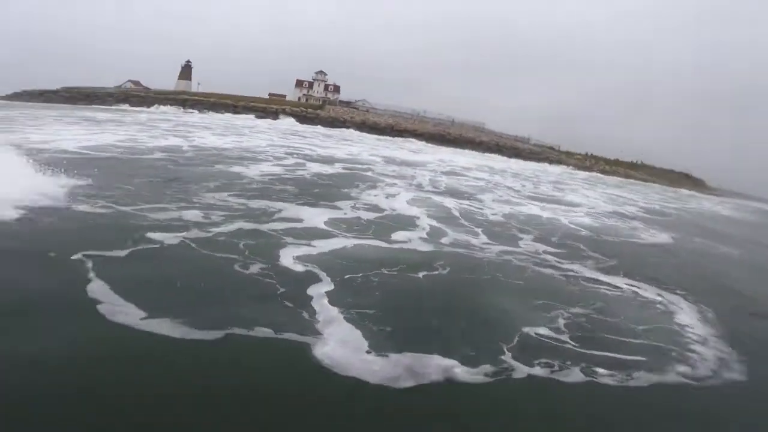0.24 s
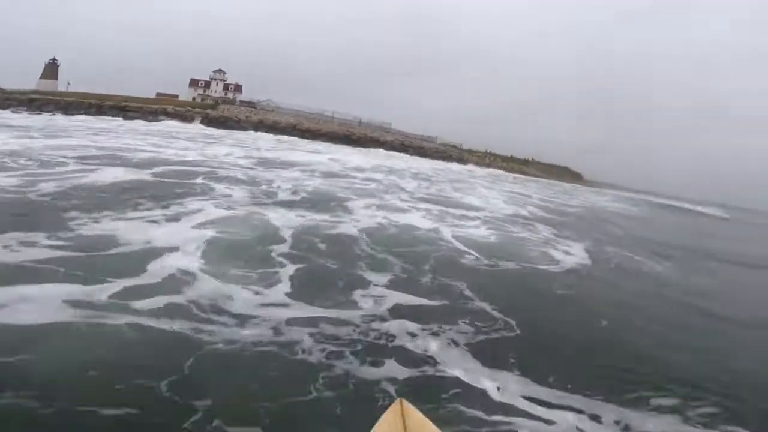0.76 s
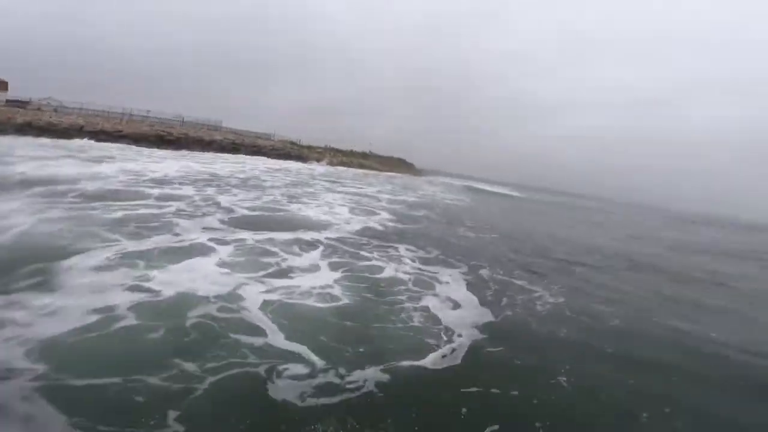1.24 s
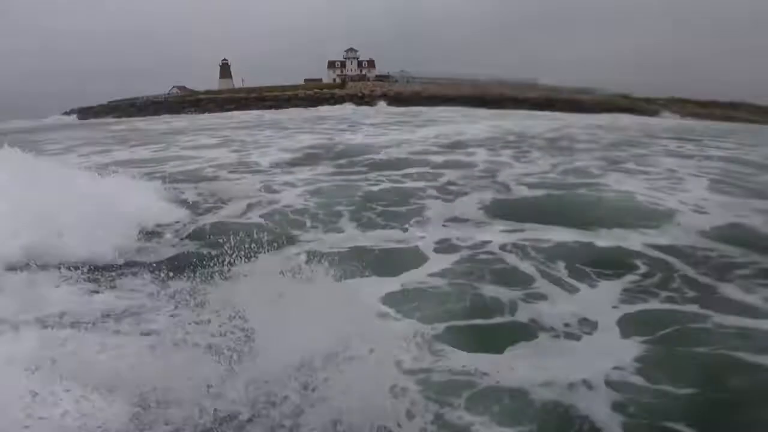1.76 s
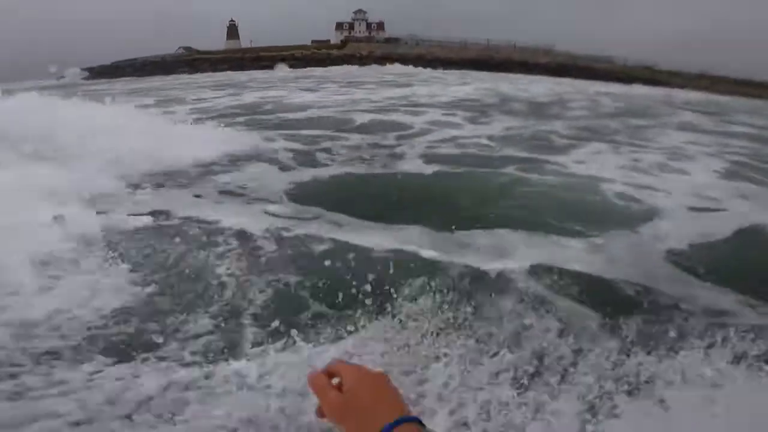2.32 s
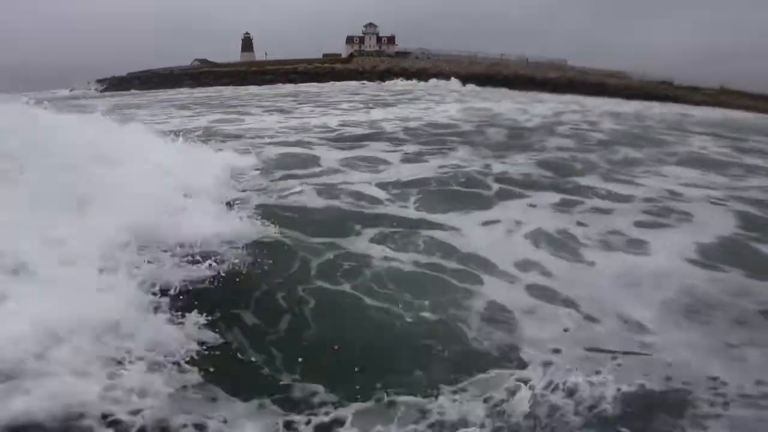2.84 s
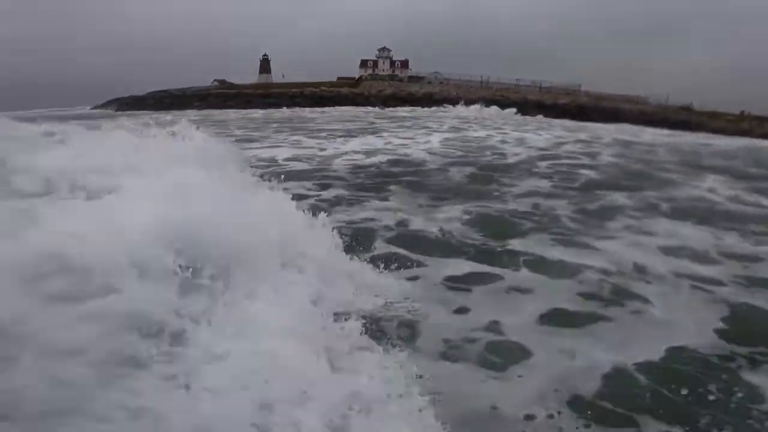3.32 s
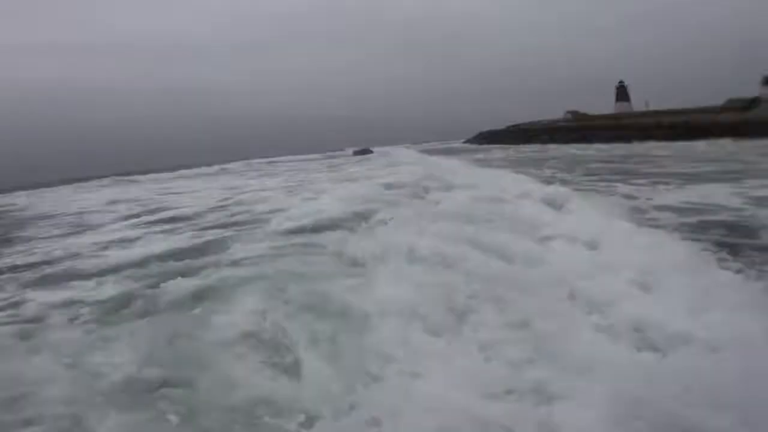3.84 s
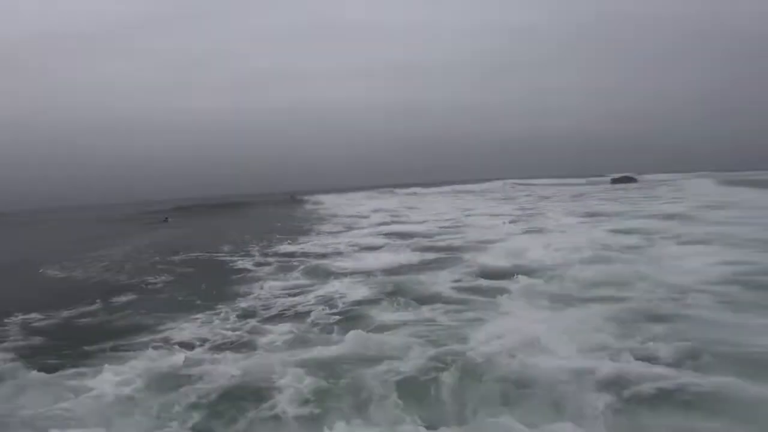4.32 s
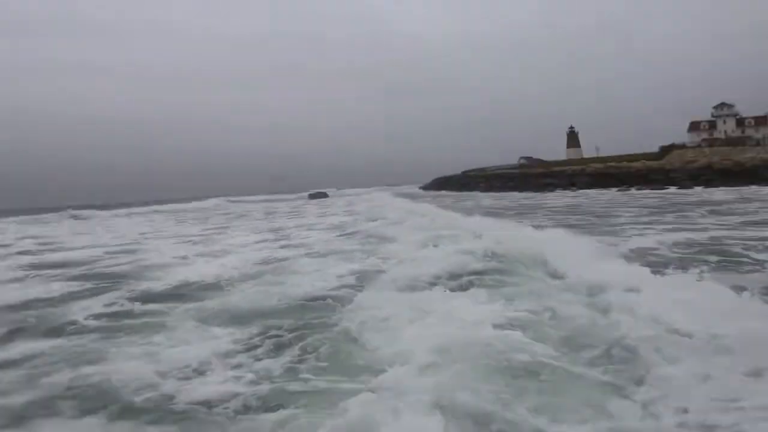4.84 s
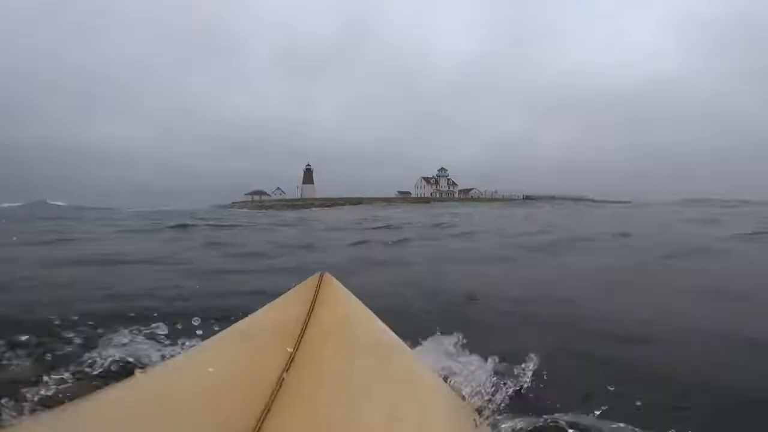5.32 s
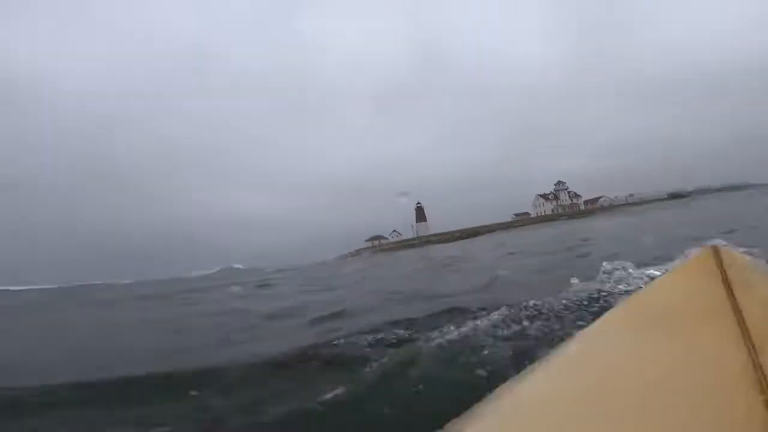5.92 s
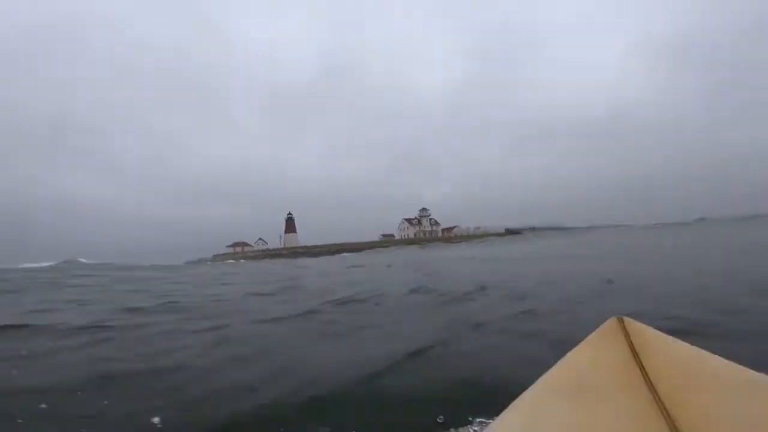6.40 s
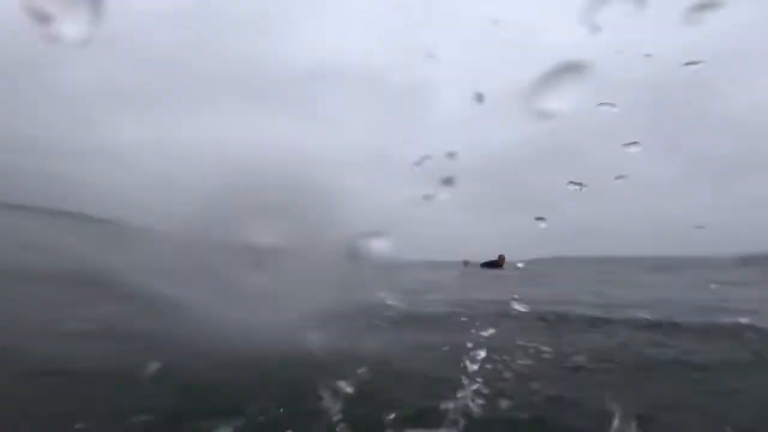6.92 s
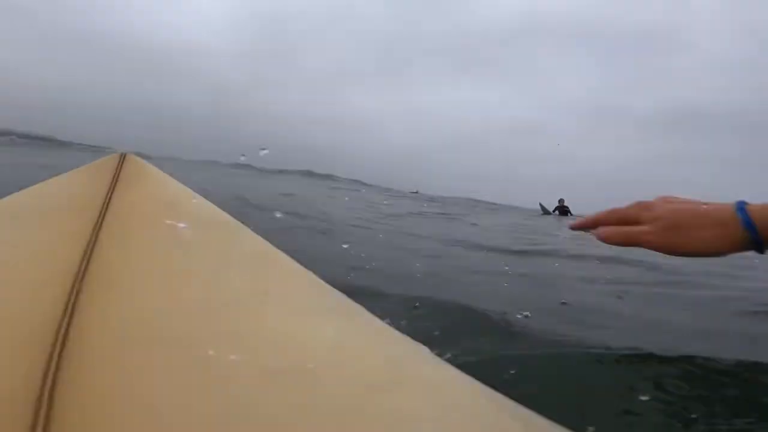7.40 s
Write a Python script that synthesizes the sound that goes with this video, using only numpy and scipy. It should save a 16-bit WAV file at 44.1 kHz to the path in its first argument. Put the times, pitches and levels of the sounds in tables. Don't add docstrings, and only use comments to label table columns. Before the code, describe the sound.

A microphone in a wet waterproof housing rides a breaking wave: dull, dense whitewater roar, low wind buffeting, soft foam thuds and faint muffled fizz. After five seconds it cuts hard, with a tiny gap, to paddling on calmer open water: close hollow gulps, bubbling gurgles, ticking drops, then a brief splash washing over the housing.

```python
import sys
import numpy as np
from scipy import signal
from scipy.fft import rfft, irfft, next_fast_len
from scipy.io import wavfile
from scipy.ndimage import uniform_filter1d, minimum_filter1d, map_coordinates

SR = 44100
rng = np.random.default_rng(int(sys.argv[2]) if len(sys.argv) > 2 else 0)


def output_pcm(signal):
    pcm = np.clip(np.atleast_2d(signal).T, -1, 1) * 32767
    wavfile.write(sys.argv[1], SR, np.round(pcm).astype(np.int16))


def nominal_scale(level):
    x = np.asarray(level, float) / 20
    return 10 ** x


N = 337638

# frequency_hz, density_db (per Hz)
WIND_SPECTRUM = [(12, -37), (22, -2.5), (40, -1.5), (90, -4.5), (140, -9), (250, -18.5), (500, -46),
                 (1000, -120)]
RIDE_ROAR_SPECTRUM = [(60, -41), (120, -3.5), (220, -1), (350, -4.5), (550, -5.5), (800, -10.5),
                      (1200, -25.5), (2000, -50), (4000, -120)]
PADDLE_ROAR_SPECTRUM = [(60, -48.5), (120, -10.5), (220, -2.5), (350, -0.5), (550, -4), (800, -6),
                        (1300, -17.5), (1800, -44.5), (4000, -120)]
WASH_SPECTRUM = [(500, -37.5), (900, 6.5), (1200, -0.5), (1500, -9.5), (2000, -18), (2500, -24),
                 (3200, -46.5), (6000, -120)]
FIZZ_SPECTRUM = [(1500, -32), (2500, 1), (3200, -3), (4200, -8.5), (5200, -14.5), (6500, -21.5),
                 (8000, -31.5), (9300, -42), (9900, -74.5), (16000, -90.5)]
# frequency_hz, gain_db
SPATTER_SPECTRUM = [(800, -40), (1600, 3), (3000, -2), (4500, -10), (6000, -21), (7500, -34), (10000, -70)]
# centre_hz, width_hz, level_db
HOUSING_MODES = [(1920, 300, -2), (2700, 450, -23), (1350, 400, -1), (3750, 600, -22), (4900, 600, -30),
                 (6300, 900, -43), (880, 150, 8)]

# time_s, strength_db
WIND_STRENGTH = [(0.03, -17.5), (0.3, -25), (0.81, -21), (1.78, -24), (2.14, -22), (2.86, -25.5),
                 (3.35, -19.5), (4.04, -25), (4.63, -20), (5.06, -27), (5.3, -18), (5.79, -21.5),
                 (6.08, -17), (6.29, -23.5), (7.46, -21.5), (7.64, -27.5)]
# time_s, strength_db
RIDE_CHURN = [(0.03, -20.5), (0.28, -20.5), (0.65, -19), (1.26, -18), (1.75, -19), (2.23, -18.5),
              (2.78, -18.5), (2.9, -16.5), (3.57, -17.5), (4.84, -18.5), (5.26, -17)]
# time_s, strength_db
PADDLE_CHURN = [
    (5.35, -23.5),
    (5.47, -22.5),
    (5.5, -26),
    (5.7, -25),
    (5.86, -21),
    (6.3, -22.5),
    (6.79, -22.5),
    (7.1, -21.5),
    (7.64, -21.5),
]
# time_s, density_db
SPRAY_DENSITY = [(0.03, -63.5), (0.4, -57), (1.2, -60.5), (1.7, -59), (2.3, -59.5), (3.1, -61), (3.6, -60),
                 (4.15, -63.5), (5.06, -67), (5.26, -64), (5.35, -64.5), (7.64, -64.5)]

# start_s, length_s, strength_db, fizz_share (ratio)
SLOSHES = [(0.137, 0.31, -1, 0.22), (0.79, 0.3, -4.5, 0.46), (1.09, 0.37, -6, 0.093), (1.31, 0.31, -2, 1.9),
           (1.452, 0.21, -3.5, 1.4), (1.613, 0.29, 1.5, 0.75), (2.365, 0.15, 3.5, 0.12),
           (2.522, 0.21, 2, 0.033), (1.79, .14, 1, 2.5), (1.902, 0.6, -1.5, .05), (2.7, 0.12, -10, 0.6),
           (2.8, 0.26, -3.5, .05), (3.0, 0.045, -7.5, 0.44), (3.096, 0.063, 4, 0.076),
           (3.208, 0.2, -3, 1.3), (3.844, 0.13, -6, 0.1), (4.048, 0.15, -5, 0.75), (5.383, 0.11, 0.5, 1.2),
           (5.474, 0.053, -4.5, 1.2), (5.537, 0.087, 4, 0.81), (5.632, 0.03, 4, .2), (5.79, 0.15, 4, 1.1),
           (5.946, 0.089, 0, 1.2), (6.15, 0.12, 3.5, 1.1), (6.244, 0.11, 6, 0.44), (6.38, 0.32, 5.5, 1.1),
           (6.6, 0.12, 2.5, .8), (6.688, 0.28, -6.5, 0.76), (6.839, 0.04, 8, 1.2), (6.903, .035, 4, 1.4),
           (6.96, .05, 3.5, 0.13), (7.03, 0.12, 3.5, .6), (7.247, .36, 4.5, 1.1)]
# start_s, length_s, level_db, top_hz
MIST_WISPS = [
    (1.27, .07, -82, 15500),
    (1.385, .03, -90, 14000),
    (3.17, 0.042, -97, 13000),
    (5.338, .1, -83, 15000),
    (7.058, .07, -88, 12500),
]
# start_s,
# length_s, level_db, pitch_hz
AIR_POCKETS = [(0.45, 0.3, -22.5, 173), (0.796, 0.36, -23.5, 184), (1.05, 0.35, -18, 181),
               (2.383, .11, -30.5, 1340), (2.395, 0.09, -40, 1900), (3.09, .08, -35, 1250),
               (2.538, 0.065, -42, 1700), (2.52, 0.14, -22.5, 270), (2.652, 0.058, -20, 326),
               (2.817, 0.15, -20, 259), (3.099, 0.18, -22, 252), (4.38, 0.2, -24, 170),
               (4.908, 0.26, -18, 268), (5.201, 0.18, -16.5, 303), (5.501, .25, -32.5, 340),
               (5.53, 0.22, -35.5, 540), (5.797, 0.088, -24.5, 262), (5.54, .08, -36, 1300),
               (5.83, 0.11, -38, 1300), (5.36, .13, -26.5, 630), (2.55, .16, -37, 1250),
               (1.62, .2, -35.5, 1230), (7.27, .2, -46.5, 2000), (2.44, .12, -38, 1500),
               (2.62, .09, -46, 2100), (5.6, .1, -30, 950), (2.1, .12, -48, 2100),
               (5.902, 0.55, -39.5, 970), (6.452, 0.22, -34, 1100), (6.15, .19, -65, 3300),
               (6.47, 0.24, -50, 2260), (6.5, 0.22, -59.5, 3200), (6.6, 0.076, -25.5, 286),
               (6.932, 0.069, -29, 1070), (7.06, 0.079, -21, 300)]
# start_s, peak_db, brightest_hz
DROPS = [(2.447, -54, 3600), (5.361, -51, 3200), (5.394, -52, 2800), (5.403, -49, 4300),
         (5.4045, -44, 2600), (5.442, -50, 3200), (5.457, -54, 3800), (5.531, -51, 3000),
         (5.571, -52, 4500), (5.587, -50, 4700), (5.600, -43, 3200), (5.651, -52, 3400), (5.676, -48, 3700),
         (5.781, -59, 4600), (5.808, -55, 5200), (5.809, -44, 2300), (5.84, -45, 3400),
         (5.845, -57.5, 5700), (5.864, -43, 2900), (5.891, -53.5, 3900), (5.958, -45, 2600),
         (5.986, -53, 3000), (6.010, -46, 2754), (6.05, -48, 2750), (6.096, -53, 2800), (6.190, -49, 3600),
         (6.435, -53, 4500), (6.463, -53, 5200), (6.487, -51, 4200), (6.776, -52, 2600), (6.837, -58, 5300),
         (6.845, -50.5, 4500), (6.846, -49, 2500), (6.859, -47, 3900), (6.860, -45, 2000),
         (6.876, -55, 3500), (6.914, -49, 4000), (6.975, -54, 4000), (7.027, -50, 3800), (7.037, -40, 4000),
         (7.038, -34, 2400), (7.047, -47, 2800), (7.075, -42, 3800), (7.103, -56, 5900), (7.163, -45, 4200),
         (7.183, -44, 4100), (7.200, -55, 4000), (7.220, -56, 4900), (7.252, -55, 3000), (5.638, -31, 1700),
         (5.601, -40, 1800), (6.859, -38, 1500), (7.222, -41, 1800), (7.398, -35, 1900), (7.4, -52, 3200),
         (7.435, -44, 2300), (7.53, -40, 1750), (7.532, -53, 3000), (6.097, -54, 5000), (6.34, -57, 5200)]
# start_s, peak_db, pitch_hz
LARGE_BUBBLES = [(3.125, -33, 2250), (5.478, -13, 700), (5.552, -16.5, 847), (5.556, -17, 890),
                 (5.638, -24, 1450), (5.672, -13, 793), (5.726, -16, 667), (6.004, -12.5, 900),
                 (6.057, -10.5, 794), (6.297, -15, 840), (6.31, -14.5, 885), (6.345, -9, 800),
                 (6.441, -17, 780), (6.488, -14.5, 705), (6.545, -16, 744), (6.588, -14.5, 977),
                 (6.648, -13, 825), (6.688, -12.5, 620), (6.876, -23, 1450), (6.938, -14, 780),
                 (6.98, -30, 1500), (6.995, -13.5, 500), (7.035, -28, 1740), (7.074, -23, 1320),
                 (7.105, -33, 2040), (7.14, -28, 1980), (7.19, -38, 2200), (7.218, -27, 1300),
                 (5.343, -21, 940), (5.362, -15, 432), (5.385, -16, 700), (5.466, -13.5, 450),
                 (5.64, -16, 906), (5.772, -30, 1245), (5.862, -25, 1360), (5.905, -14.5, 600),
                 (6.518, -17, 603), (6.712, -15.5, 480), (6.742, -19.5, 450), (6.858, -15.5, 854),
                 (6.982, -15, 678), (7.292, -13.5, 800), (7.445, -12.5, 850), (7.487, -17, 550),
                 (7.545, -14, 620), (7.625, -20, 780)]
# start_s, peak_db, pitch_hz
FOAM_BURSTS = [(0.094, -14, 716), (0.47, -13, 452), (0.678, -12.5, 568), (0.95, -16, 538),
               (1.579, -14, 565), (2.148, -12, 735), (2.625, -14, 563), (2.799, -10, 584),
               (2.873, -11, 541), (2.943, -15, 681), (3.026, -16, 587), (3.208, -9, 681), (3.464, -10, 659),
               (3.698, -13, 452), (3.83, -13, 479), (3.918, -16, 560), (4.137, -16, 587), (4.43, -16, 522),
               (4.65, -14, 592), (4.828, -10, 662), (5.043, -15.5, 581), (5.102, -14, 592)]

CUT_S, RETURN_S, FADE_S = 5.29435, 5.331, 0.012
OPENING, CREST = .27, 0.31
WASH_OVER_DB, WASH_FOLLOWS = 24, 0.3
SLOSH_RISE, SLOSH_FALL = 0.32, .3
SLOSH_ROAR = 0.15
PORT_SHUT_S, PORT_DRAIN = .015, 0.53
POCKET_WIDTH, POCKET_EDGE = 0.19, 0.39
DROP_WIDTH, DROP_SPREAD = .19, .36
SHEET_S, SHEET_LENGTH_S, SHEET_EDGE_S = 7.028, .18, .016
SHEET_DB, SHEET_SAG_DB_PER_S = -29.5, 28


def unit(x):
    return x / np.sqrt(np.mean(x ** 2) + 1e-20)


def along(points, hz):
    f, v = np.transpose(points)
    return np.interp(np.log(hz + 1), np.log(f + 1), v)


def curve(rows):
    s, value = np.transpose(rows)
    return np.interp(np.arange(N) / SR, s, value)


def wobble(rate_hz):
    knots = rng.standard_normal(int(N * 80 / SR) + 4)
    return map_coordinates(knots, [np.arange(N) * rate_hz / SR])


def swell(start_s, length_s, rise_s, fall_s):
    corners_s = start_s + np.sort([0, rise_s, length_s - fall_s, length_s])
    return np.interp(np.arange(N), corners_s * SR, [0, 1, 1, 0])


def filtered(x, response):
    m = next_fast_len(N + 8192)
    return irfft(rfft(x, m) * response(np.fft.rfftfreq(m, 1 / SR)), m)[:N]


def patchy(depth_db):
    z = signal.stft(rng.standard_normal(N), nperseg=512)[2]
    field = uniform_filter1d(rng.standard_normal(z.shape), size=5, axis=0)
    field = uniform_filter1d(field, size=8, axis=1)
    return signal.istft(z * nominal_scale(depth_db * unit(field)), nperseg=512)[1][:N]


def bubbles(starts_s, hz, size, cycles, rise):
    t = np.arange(1200) / SR
    turns = hz[:, None] * t
    ring = np.sin(2 * np.pi * turns * (1 + rise * turns / cycles / 2))
    ring *= size[:, None] * np.exp(-3 * turns / cycles) * (1 - np.exp(-turns / 1.2))
    ring *= np.cos(np.pi / 2 * t / t[-1])
    at = np.round(starts_s * SR).astype(int)[:, None] + np.arange(len(t))
    return np.bincount(at.ravel(), ring.ravel(), N + len(t))[:N]


def froth(spectrum, centre_hz, cycles, share, spread_db, depth_db, count):
    draw = rng.random((count, 3))
    hz = centre_hz * np.exp(1.366 * (draw[:, 1] - .5))
    size = nominal_scale(-spread_db * np.log(0.026 + draw[:, 2]))
    swarm = unit(bubbles(draw[:, 0] * N / SR, hz, size, cycles, rise=0.26))
    noise = unit(filtered(patchy(depth_db), lambda f: nominal_scale(along(spectrum, f))))
    centre_db = along(spectrum, centre_hz)
    swarm = unit(filtered(swarm, lambda f: nominal_scale(np.minimum(along(spectrum, f) - centre_db, 0))))
    return unit(np.sqrt(1 - share) * noise + np.sqrt(share) * swarm)


def wind():
    buffet = filtered(patchy(0.54), lambda f: nominal_scale(along(WIND_SPECTRUM, f)))
    return nominal_scale(curve(WIND_STRENGTH)) * unit(nominal_scale(0.5 * wobble(6.1)) * buffet)


def mist():
    air = rng.standard_normal(N)
    out = np.zeros(N)
    for s, length, db, top_hz in MIST_WISPS:
        hiss = unit(filtered(air, lambda f: (f > 7500) & (f < top_hz)))
        out += nominal_scale(db) * swell(s, length, .3 * length, .3 * length) * hiss
    return out


def slosh_levels():
    shapes = []
    for s, length, db, _ in SLOSHES:
        if db > 0:
            shapes.append(swell(s, length, SLOSH_RISE * length, SLOSH_FALL * length))
        else:
            shapes.append(swell(s, length, PORT_SHUT_S, PORT_DRAIN * length))
    shapes = np.array(shapes)
    _, _, slosh_db, fizz_share = np.transpose(SLOSHES)
    return slosh_db @ shapes, (fizz_share * slosh_db) @ shapes


def roar(slosh_db, surge, calm):
    foam = froth(RIDE_ROAR_SPECTRUM, 430.7, cycles=7.5, share=.12, spread_db=4, depth_db=0.5, count=2500)
    gurgle = froth(PADDLE_ROAR_SPECTRUM, 748, cycles=12.5, share=0.12, spread_db=2.5, depth_db=0.6,
                   count=1100)
    level_db = curve(RIDE_CHURN + PADDLE_CHURN) + SLOSH_ROAR * slosh_db
    return nominal_scale(level_db + 0.26 * surge + 0.46) * np.where(calm, gurgle, foam)


def wash(slosh_db, surge):
    spray_db = curve(SPRAY_DENSITY)
    mean_db = spray_db.mean()
    level_db = mean_db + WASH_OVER_DB + WASH_FOLLOWS * (spray_db - mean_db) + slosh_db
    water = froth(WASH_SPECTRUM, 1500, cycles=7, share=.12, spread_db=3, depth_db=1.2, count=3500)
    return nominal_scale(level_db + surge + 4.5) * water


def fizz(slosh_db, surge, calm):
    foam = froth(FIZZ_SPECTRUM, 4000, cycles=3.5, share=.1, spread_db=3, depth_db=1.2, count=4000)
    droplets = froth(FIZZ_SPECTRUM, 3200, cycles=16, share=.07, spread_db=3, depth_db=2.2, count=600)
    level_db = curve(SPRAY_DENSITY) + slosh_db
    flicker_db = 0.44 * surge + 0.97 * wobble(35) * calm
    return nominal_scale(level_db + flicker_db + 1.74) * np.where(calm, droplets, foam)


def sea():
    slosh_db, fizz_slosh_db = slosh_levels()
    calm = np.arange(N) / SR > CUT_S
    surge = wobble(22) * np.where(calm, 1.6, .8)
    return roar(slosh_db, surge, calm) + wash(slosh_db, surge) + fizz(fizz_slosh_db, surge, calm)


def air_pockets():
    out = np.zeros(N + SR)
    f = np.fft.rfftfreq(SR // 2, 1 / SR)
    for s, length, db, hz in AIR_POCKETS:
        resonance = np.exp(-((f / hz - 1) / POCKET_WIDTH) ** 2)
        band = unit(irfft(rfft(rng.standard_normal(SR // 2)) * resonance))
        u = np.arange(len(band)) / SR / length
        envelope = np.clip(np.minimum(u, 1 - u) / POCKET_EDGE, 0, 1)
        out[round(s * SR):][:len(band)] += nominal_scale(db) * band * envelope
    return out[:N]


def sheet():
    level_db = SHEET_DB - SHEET_SAG_DB_PER_S * (np.arange(N) / SR - SHEET_S).clip(0)

    def modes(f):
        return sum(nominal_scale(db) * np.exp(-((f - c) / w) ** 2) for c, w, db in HOUSING_MODES)

    hiss = nominal_scale(level_db + 2 * wobble(40)) * unit(filtered(patchy(2), modes))
    return hiss * swell(SHEET_S, SHEET_LENGTH_S, SHEET_EDGE_S, 2 * SHEET_EDGE_S) ** 2


def drops():
    t = np.arange(2048) / SR
    f = np.fft.rfftfreq(len(t), 1 / SR)
    lead = 256
    puff = np.roll(np.exp(-t / .0016) + .25 * np.exp(-t / .006), lead)
    out = np.zeros(N + len(t))
    for s, db, hz in DROPS:
        plain = nominal_scale(along(SPATTER_SPECTRUM, f)) * DROP_SPREAD / (1 + (f / hz / 1.6) ** 4)
        colour = plain + np.exp(-((f / hz - 1) / DROP_WIDTH) ** 2)
        tick = irfft(rfft(puff * np.sign(rng.standard_normal(len(t)))) * colour)
        out[round(s * SR) - lead:][:len(t)] += nominal_scale(db + 2.5) * tick / np.abs(tick).max()
    return out[:N]


def foam_bursts():
    s, db, hz = np.transpose(FOAM_BURSTS)
    return bubbles(s, hz, nominal_scale(db + 0.5), cycles=9, rise=.06)


def gulps():
    s, db, hz = np.transpose(LARGE_BUBBLES)
    return bubbles(s, hz, nominal_scale(db + 3), cycles=16, rise=.12)


def scene():
    background = wind() + mist() + sea()
    events = air_pockets() + sheet() + drops() + foam_bursts() + gulps()
    return (background + events)[None]


def band_limit(x):
    return signal.sosfilt(signal.butter(12, 15800, fs=SR, output="sos"), x)


def record(dry):
    need = np.minimum(1, .56 / (np.abs(dry) + 1e-9))
    x = dry * uniform_filter1d(minimum_filter1d(need, size=801), size=401)
    t = np.arange(N) / SR
    cut = round(CUT_S * SR)
    lift = np.cos(np.pi / 2 * np.clip(np.abs(CUT_S - t) / 0.00069, 0, 1)) ** 2
    onset = np.cos(np.pi / 2 * np.clip(t / 0.0029, 0, 1)) ** 2
    crested = x + (CREST - x[:, cut - 1:cut]) * lift
    crested += (OPENING - x[:, :1]) * onset
    fade = np.sin(np.pi / 2 * np.clip((t - RETURN_S) / FADE_S, 0, 1)) ** 2
    residue = nominal_scale(-43.5 - 1600 * np.clip(t - CUT_S, 0, 1))
    mix = np.where(np.arange(N) < cut, crested, x * (fade + residue))
    return band_limit(mix)


dry = scene()
out = record(dry)
output_pcm(out)
```